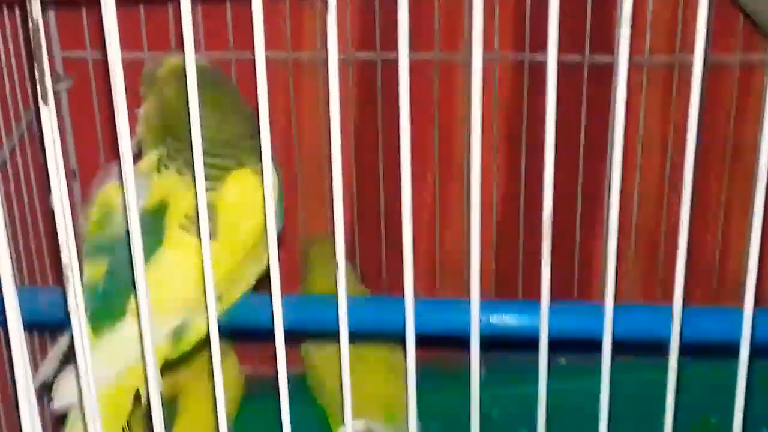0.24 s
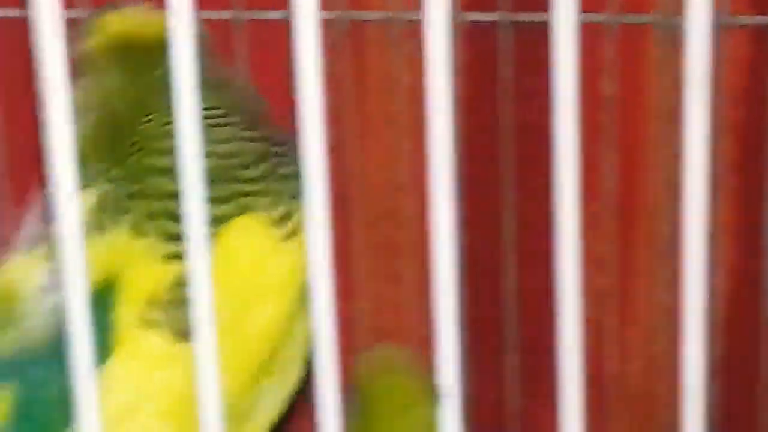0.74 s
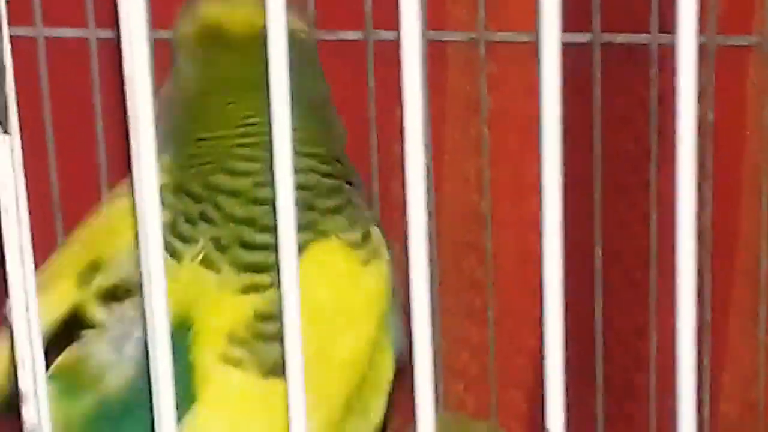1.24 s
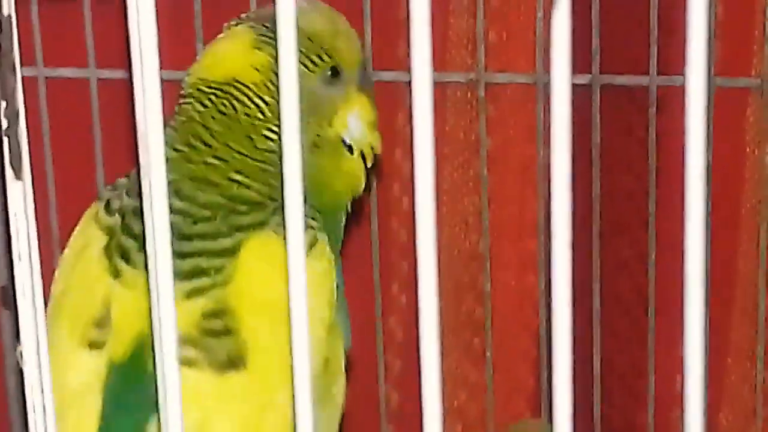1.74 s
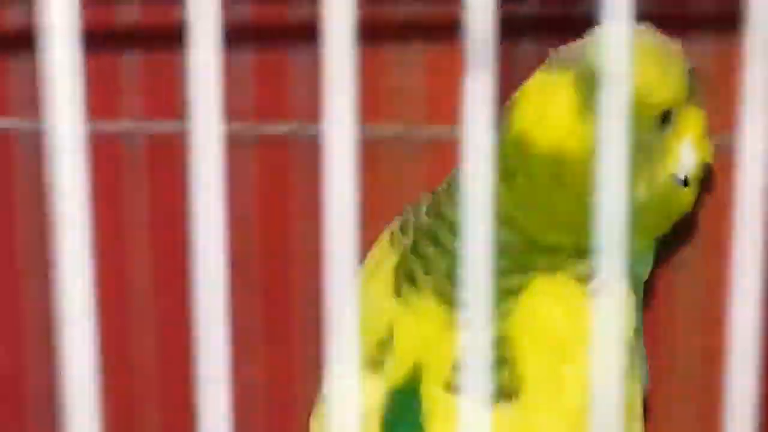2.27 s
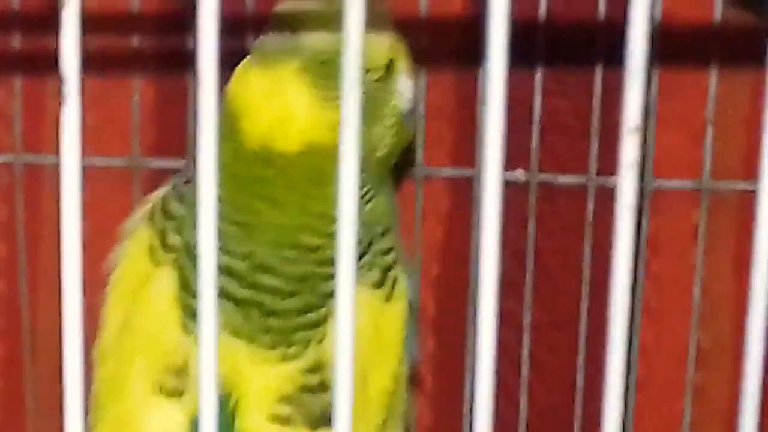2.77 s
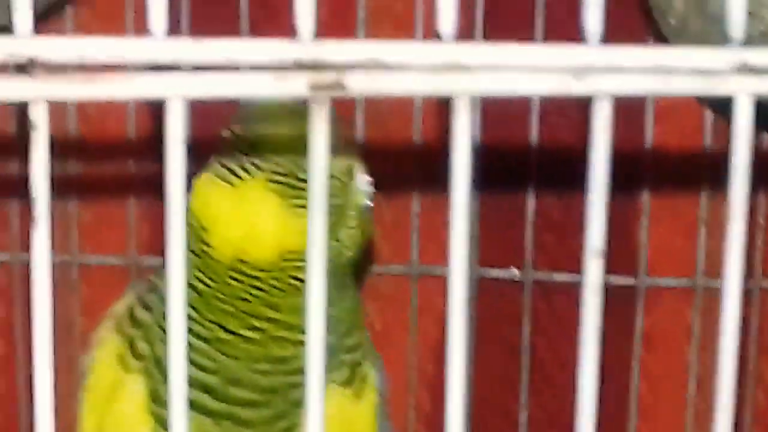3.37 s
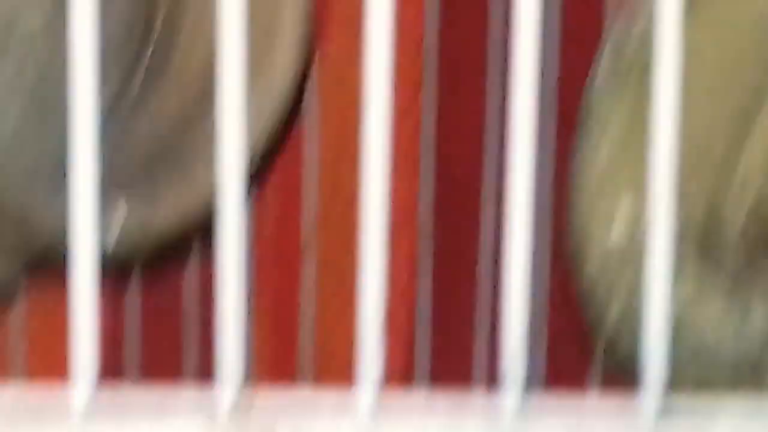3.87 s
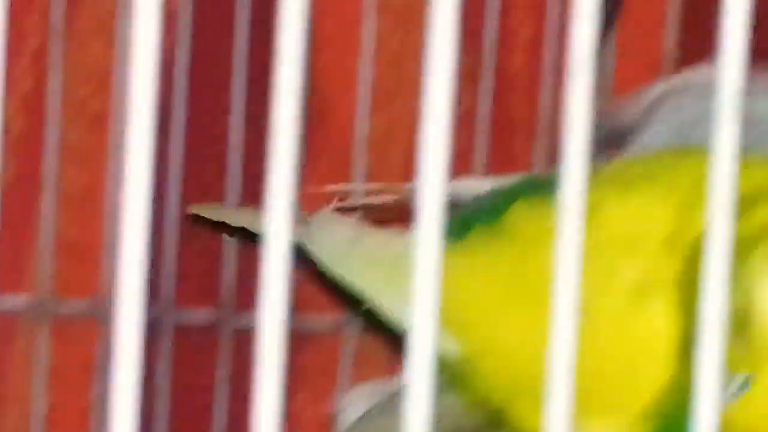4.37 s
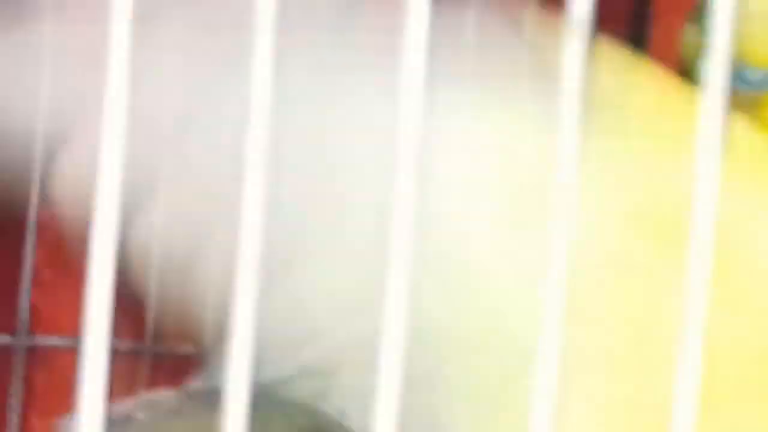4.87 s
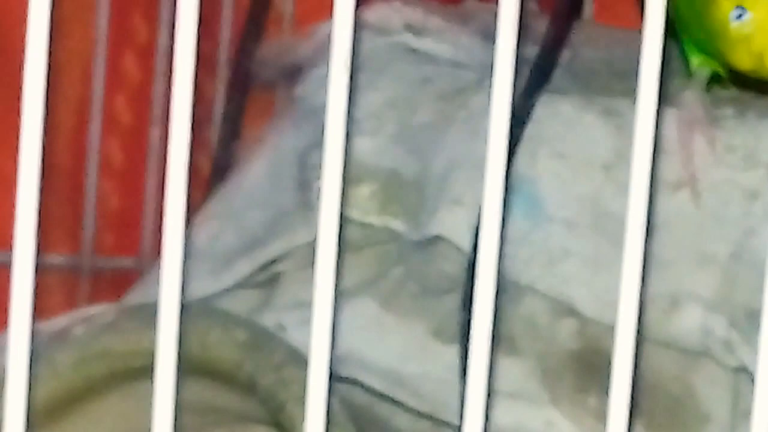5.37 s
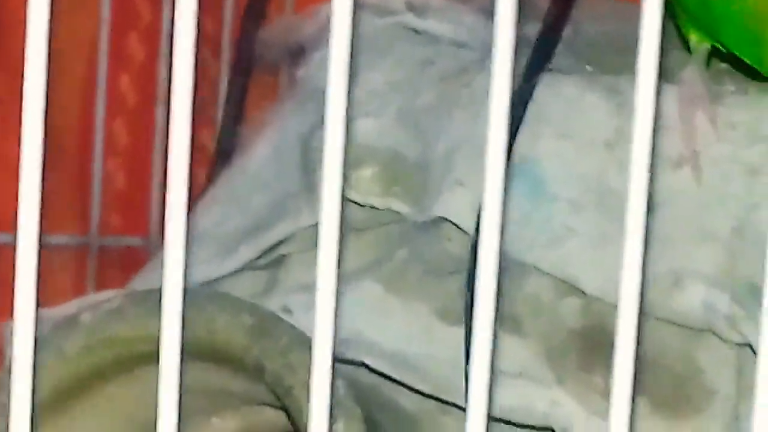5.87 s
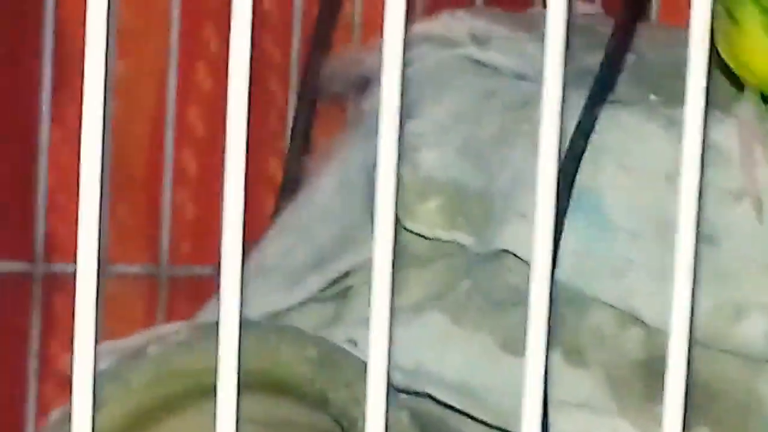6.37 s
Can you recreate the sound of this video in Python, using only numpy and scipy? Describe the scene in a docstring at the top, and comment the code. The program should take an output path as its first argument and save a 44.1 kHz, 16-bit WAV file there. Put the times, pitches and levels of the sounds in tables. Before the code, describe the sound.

Budgerigars chatter in a cage in a bare, hard-walled room, close to a phone. Soft, scratchy mutters and small whistled chirps come in clusters with gaps; after nearly four seconds a loud, bright burst rings out, then more strong chirps near five and six seconds. Distant birds twitter through the long echo, over faint low hum and hiss.

```python
"""Budgerigars chatter in a cage in a bare, hard-walled room, close to a phone.
Every note is a short gliding whistle with overtones; many are roughened into a rasp of pulses and hiss.
The room's long echo, made of fading noise, smears the notes. Birds further off twitter only through it.
Underneath are a mains hum, a plain tone of wavering level, and steady microphone hiss, filtered noise."""
import sys
import numpy as np
from scipy import signal
from scipy.fft import rfft, irfft, next_fast_len
from scipy.io import wavfile
from scipy.ndimage import uniform_filter1d

SR = 44100
rng = np.random.default_rng(int(sys.argv[2]) if len(sys.argv) > 2 else 0)


def persist_wave(psi):
    """Save psi, clipped to +-1, as 16-bit WAV."""
    counts = np.round(np.clip(psi, -1, 1) * 32767).astype(np.int16)
    wavfile.write(sys.argv[1], SR, np.atleast_2d(counts).T)


N = 291501  # length in samples
LEAD_S = 1  # seconds worked out before the scene opens, so that the echo is already going
USUAL_HZ = 2300  # usual pitch of a note


def undb(db):
    """Turn decibels into a gain."""
    return 10 ** (np.asarray(db) / 20)


def colour(x, points):
    """Filter a sound by (Hz, dB) points, joined by straight lines over log frequency."""
    size = next_fast_len(len(x))
    hz, db = np.transpose(points)
    f = np.maximum(np.arange(size // 2 + 1) * SR / size, 1)
    gain = undb(np.interp(np.log(f), np.log(hz), db))
    return irfft(rfft(x, size) * gain, size)[:len(x)]


# The notes of the near birds, one by one.
# Each row: start in seconds, level in dB before the beak colours it, start pitch in Hz, end pitch in Hz,
# length in seconds (at least 0.006 is played), first overtone in dB against the whistle,
# and echo in dB against the direct sound: higher for a bird further off or turned away.
NEAR_NOTES = [(.013, -35, 2750, 2810, 0.018, -31, -2), (.005, -46, 1233, 793, 0.039, -18, -1),
              (.014, -42, 3360, 3310, 0.013, -28, -4.5), (.015, -47, 1760, 1605, .021, -3, 1.7),
              (.061, -36, 2870, 2700, .014, -29, -9), (.075, -42, 2200, 2220, 0.011, -23, -13),
              (.075, -43, 1072, 1230, 0.018, 1.5, -3.5), (.1, -45, 1560, 1670, 0.018, 4, -14),
              (.118, -48, 2980, 3080, 0.017, -16, -3), (.223, -39.5, 2440, 2790, .02, -15, -2),
              (.223, -46, 1145, 1850, 0.025, -6, -0.5), (.237, -50, 3365, 3480, .024, -38, 8),
              (.262, -48, 2020, 2160, .015, 2, -1), (.243, -38, 1696, 1780, 0.023, -10, -10.5),
              (.282, -42, 2385, 1760, 0.053, -17, 1.5), (.325, -46.5, 1783, 1580, 0.0276, -3, -7),
              (.322, -38.5, 2987, 2630, 0.038, -33, -2.5), (.58, -42, 1904, 1938, 0.022, -16, 3),
              (.58, -32.5, 2580, 2520, 0.012, -24, 5), (.642, -35.5, 2590, 2600, 0.013, -39, -7),
              (.68, -37.5, 2600, 2420, 0.029, -23, -3), (.704, -39, 1066, 983, 0.035, -16, -15.5),
              (.72, -41.5, 2096, 1973, 0.043, -14.5, 4), (.729, -37.5, 1100, 1205, 0.029, -9.5, -3),
              (.76, -44.5, 855, 1020, .007, -25, 13.5), (.786, -30, 2785, 2764, 0.0067, -30, 3),
              (.783, -38.5, 1116, 1280, 0.02, -32, -10), (.806, -41.5, 1197, 944, 0.023, -37, -8.5),
              (1.288, -46.5, 2570, 2700, 0.021, -25, -15), (1.405, -45, 1434, 1630, 0.0087, 3.5, -0.5),
              (1.41, -42.5, 1024, 1080, 0.0054, -16, 6), (1.422, -43, 2316, 2660, 0.033, -30, 7),
              (1.42, -42, 2590, 2600, 0.0066, 4, -3.5), (1.544, -42, 2100, 1516, 0.034, -13, -3.5),
              (1.545, -36, 3100, 2637, 0.041, -27.5, 1.5), (1.682, -27.5, 2700, 2730, 0.0085, -39, 0.5),
              (1.68, -42.5, 1400, 990, 0.03, -22, 1), (1.702, -38.5, 2264, 2060, 0.015, -28.5, 5),
              (1.73, -30, 2515, 2780, 0.015, -35, -10), (1.764, -25.5, 2590, 2730, 0.014, -47, -3),
              (1.786, -33, 3050, 2995, 0.034, -41, -3), (1.797, -40, 2960, 1560, 0.022, -30, 6),
              (1.814, -54, 647, 1020, 0.022, -22, 10), (1.841, -43.5, 850, 1150, 0.027, -15, -5.5),
              (1.858, -43.5, 1150, 850, .024, -13.5, 0.5), (1.85, -36.5, 2940, 3060, .023, -36.5, -3.5),
              (1.895, -44, 900, 1186, 0.026, -17.5, -11), (1.928, -44.5, 1150, 842, 0.031, -32, -6.5),
              (2.011, -40, 1190, 980, .006, -25, 9), (2.181, -44, 2540, 2930, 0.026, -30.5, -12),
              (2.323, -50.5, 1303, 1330, 0.03, -16.5, -3), (2.42, -51.5, 797, 623, 0.042, -14, -4.5),
              (2.475, -48, 3370, 3160, .014, -34, -13.5), (2.48, -39.5, 2175, 1685, 0.046, -24.5, 3.5),
              (2.535, -49.5, 868, 640, 0.028, -12, -4), (2.505, -49.5, 3300, 3440, 0.042, -34, -1),
              (2.545, -40, 3270, 3240, 0.019, -44, 8), (2.57, -33, 3000, 3327, .045, -43.5, 3),
              (2.592, -33, 2896, 2420, 0.045, -54, 4.5), (2.617, -30, 2147, 2064, 0.025, -59.5, 1.2),
              (2.632, -34.5, 2840, 3100, .044, -41.5, -15),
              (2.644, -37.5, 1053, 1140, 0.0091, -10.5, -10.5), (2.66, -32.5, 1982, 2200, 0.046, -41, -6),
              (2.672, -50, 858, 673, 0.023, -16, -5.5), (2.787, -41, 1044, 1590, 0.0082, -19.5, 0),
              (2.859, -44.5, 993, 1050, 0.011, -18, -1.5), (2.915, -45.5, 830, 1266, 0.051, -12, -1),
              (2.958, -43, 1230, 990, 0.023, -32.5, -16.5), (2.981, -42, 1700, 1587, 0.021, -20, -13),
              (3.111, -39, 974, 1130, 0.0098, -18, -8), (3.149, -35, 2184, 2190, 0.0048, -44, -5),
              (3.156, -45, 1453, 1480, 0.0063, -16, 1.5), (3.206, -43, 1300, 956, 0.027, -19, -4.5),
              (3.231, -47, 1050, 1426, 0.037, -24, -7.5), (3.262, -42.5, 950, 1090, 0.029, -42, -15.5),
              (3.284, -45, 1070, 1610, 0.011, -27.5, 2), (3.338, -42.5, 2090, 1687, 0.018, -27, -4),
              (3.343, -39, 1083, 1070, 0.0064, -20.5, -1), (3.408, -44, 1302, 1210, 0.023, -24, -6.5),
              (3.49, -42.5, 1035, 1110, 0.012, -23.5, -8.5), (3.493, -45.5, 1890, 2490, 0.011, -36, 5.5),
              (3.56, -45, 2000, 1380, .021, -20, -11), (3.595, -46.5, 3060, 3190, 0.032, -38, -5),
              (3.632, -39, 2740, 2850, .011, -36.5, 6.5), (3.633, -43, 3090, 3530, 0.026, -42, 0.3),
              (3.697, -31.5, 2400, 1720, 0.052, -12.5, -6.5), (3.739, -27.5, 2690, 2740, 0.0082, -39, -5.5),
              (3.749, -22, 2790, 2930, 0.0073, -43.5, -14), (3.755, -24.5, 3360, 3224, .022, -33, 3.5),
              (3.77, -18, 2737, 2670, 0.012, -37.5, 0), (3.793, -16, 2877, 3160, 0.014, -39, 3.5),
              (3.805, -18, 3260, 3540, 0.024, -37.5, -0.5), (3.829, -17.5, 2510, 2746, 0.022, -40.5, -2),
              (3.832, -26, 2130, 2336, 0.031, -35, 0.5), (3.849, -31, 2184, 1650, 0.022, -12, 4.5),
              (3.852, -18, 3485, 3420, 0.025, -41.5, -5), (3.859, -41, 1383, 715, .016, -18, -4),
              (4.061, -44, 883, 1400, 0.028, -3, -12.5), (4.071, -35, 1883, 1990, 0.011, -23.5, 3.5),
              (4.09, -39, 1350, 966, 0.013, -26.5, -7), (4.118, -41, 1000, 1410, 0.0099, -17.5, 6.5),
              (4.168, -34, 1874, 1940, .015, -30, 2.5), (4.233, -35.5, 2590, 2447, 0.024, -48.5, .6),
              (4.277, -27.5, 2633, 2840, .017, -42.5, -3.5), (4.303, -26.5, 3065, 3430, 0.027, -41, -5.5),
              (4.331, -22.5, 2605, 2740, 0.0072, -24.5, -6.5), (4.336, -29.5, 2272, 2260, .016, -25, -0.3),
              (4.508, -40, 1176, 1223, 0.017, -12, -5), (4.53, -43, 1396, 1760, 0.022, -3, -5.5),
              (4.555, -32.5, 2025, 2177, 0.03, -12.5, -5), (4.575, -26.5, 2193, 2500, 0.015, -34, 5),
              (4.595, -32.5, 2304, 2894, 0.02, -41.5, 1), (4.643, -25.5, 2480, 2590, 0.0092, -32.5, -13),
              (4.778, -34, 2090, 2190, 0.0096, -6.5, -4), (4.787, -33.5, 2550, 3290, 0.0065, -30, 0),
              (4.794, -36, 3740, 3270, 0.013, -40, 1.5), (4.842, -38.5, 1065, 1110, 0.0064, -19, -5),
              (4.908, -24, 2746, 2845, .018, -47, 7.5), (4.929, -23.5, 3060, 3200, 0.02, -44, 4),
              (4.917, -37, 1768, 1680, 0.025, -1.5, -3), (4.929, -48.5, 918, 1260, 0.033, -15, -8),
              (4.967, -17, 2373, 2630, 0.022, -9, -4), (4.982, -18, 2596, 2944, 0.024, -5, -0.8),
              (4.998, -16.5, 3260, 3390, .02, -17, -3), (5.015, -28, 3020, 3120, .011, -20, -3.5),
              (5.084, -37.5, 1884, 1610, 0.032, -17, 2), (5.094, -18, 2643, 2410, .016, -9, -6.5),
              (5.125, -26, 3050, 3140, 0.015, -22.5, -5), (5.175, -19, 2492, 2690, 0.018, -25, -26.5),
              (5.32, -29, 3290, 3237, .008, -35, -8.5), (5.421, -48.5, 1186, 1795, 0.028, -13.5, 2.5),
              (5.471, -41.5, 1638, 1583, 0.021, -5, -6), (5.532, -45.5, 1532, 1140, 0.025, -29, 3),
              (5.565, -40, 2330, 2334, 0.01, -21, -11), (6.010, -29.5, 3098, 2930, 0.025, -15, 8),
              (6.021, -25, 2940, 3050, .016, -9, -7), (6.037, -20.5, 2570, 2530, 0.015, -10, 1.5),
              (6.054, -39, 3230, 3310, 0.0088, -36, 4), (6.129, -31.5, 1964, 1727, .037, -2.5, -6),
              (6.139, -17, 3074, 3010, 0.0244, -9, -9), (6.154, -20, 3004, 3058, 0.018, -9, 4),
              (6.183, -29, 2787, 2850, 0.056, -31.5, 6), (6.236, -18, 2653, 2760, 0.027, -28, -10),
              (6.241, -22, 3198, 3235, 0.031, -27, -1.5), (6.26, -35, 2914, 2645, 0.047, -33, -7.5),
              (6.518, -46, 850, 1360, 0.025, -14, 1), (6.543, -49.5, 1230, 1130, 0.036, -19, -7)]


def near_birds():
    """Birds near the phone: each note is heard both straight from the beak and through the room."""
    return sing(NEAR_NOTES)


# How the beak colours every note. Each row: frequency in Hz, gain in dB.
BEAK_COLOUR = [(250, -39), (600, -4), (1500, 4), (2500, -0.5), (3600, -0.5), (4300, -3.5), (6000, -11),
               (9000, -7.5), (14000, -24)]
# Colour of the rushing air in a rasp. Each row: frequency in Hz, relative level in dB.
RASP_AIR = [(1200, -33), (2500, 10.5), (4500, 2.5), (7000, -13), (10000, -27), (13000, -22), (16000, -17)]


def sing(rows):
    """Birds sing along a time line begun LEAD_S early: one track straight to the phone, one into the room."""
    tracks = np.zeros((2, N + (LEAD_S + 1) * SR))
    chances = np.clip(rng.standard_normal((len(rows), 3, 24)), -1.6, 1.6)
    air = colour(rng.standard_normal(tracks.shape[1]), RASP_AIR)
    air = air / np.std(air)
    for row, chance in zip(rows, chances):
        start_s, db, start_hz, end_hz, length, overtone_db, echo_db = row
        rasp = rasp_amount(db, start_hz, overtone_db, echo_db)
        i = int((start_s + LEAD_S) * SR)
        sound = note(db, start_hz, end_hz, length, overtone_db, rasp, chance, air[i:])
        tracks[:, i:i + len(sound)] += sound * undb([[0], [echo_db]])
    return [colour(track, BEAK_COLOUR)[:N + LEAD_S * SR] for track in tracks]


RASP_USUAL, RASP_PER_OCTAVE, RASP_PER_OVERTONE_DB, RASP_PER_ECHO_DB = .33, .1, .012, .03
HARSH_DB = -42  # an overtone louder than this adds rasp


def rasp_amount(db, start_hz, overtone_db, echo_db):
    """A voice gets rougher at higher pitch, with loud overtones, and for birds calling from further off."""
    from_pitch = RASP_PER_OCTAVE * np.log2(start_hz / USUAL_HZ)
    from_overtone = RASP_PER_OVERTONE_DB * max(db + overtone_db - HARSH_DB, 0)
    return RASP_USUAL + from_pitch + from_overtone + RASP_PER_ECHO_DB * echo_db


OVERTONE_FALL_DB = -23  # from each overtone to the next
RASP_HZ = 257.55  # pulses a second, before chance shifts their spacing
# at full rasp: pitch spread of the pulses (share), and decay of a pulse (nepers a period)
RASP_SCATTER, RASP_DAMP = 0.1077, 4.8
TREMBLE, FLICK = 0.0319, .15  # pitch unsteadiness, and pitch drop at the end (shares, scaled by chance)
AIR_DB = 6.5  # air hiss against the first overtone, at full rasp
ATTACK_S, BRIGHTEN_S = 0.0018, 0.0052  # the whistle starts fast; overtones and hiss follow as the beak opens


def note(db, start_hz, end_hz, length, overtone_db, rasp, chance, air):
    """A gliding whistle; in a rasp the voice breaks into damped pulses of varied pitch, size and spacing."""
    t = np.arange(int(max(length, .006) * SR)) / SR
    along = t / t[-1]  # 0 at the start of the note, 1 at its end
    rasp = np.clip(rasp, 0, 1)
    pitch, size, spacing = chance

    # count pulses along the note: the whole part is which pulse, the rest how far through it
    count = np.arange(len(pitch))
    gaps = np.exp(.3 * spacing) / RASP_HZ
    cycle = np.interp(t, np.cumsum(gaps) - gaps[0], count)
    pulse = cycle.astype(int)

    stray = TREMBLE * np.interp(cycle, count, size) + RASP_SCATTER * rasp * pitch[pulse]
    stray = stray - FLICK * np.abs(pitch[-1]) * along ** 4  # the pitch sags as the push runs out
    hz = start_hz * (end_hz / start_hz) ** along * np.exp(stray)
    phase = 2 * np.pi * np.cumsum(hz) / SR

    opening = np.minimum(t / BRIGHTEN_S, 1)
    overtones = sum(undb(overtone_db + k * OVERTONE_FALL_DB) * np.sin((k + 2) * phase) for k in range(3))
    tone = np.sin(phase) + opening * (1 - .5 * rasp) * overtones

    pulses = np.exp(-RASP_DAMP * rasp * (cycle - pulse)) * undb(2.24 * rasp * size[pulse])
    pulses = uniform_filter1d(pulses, size=int(0.00058 * SR))  # the syrinx cannot open at once
    pulses = pulses / np.sqrt(np.mean(pulses ** 2))

    hiss = opening * rasp * undb(overtone_db + AIR_DB) * air[:len(t)]
    hiss = hiss * np.sqrt(pulses)  # the square root keeps more hiss between pulses

    shape = np.minimum(t / ATTACK_S, 1) * np.cos(np.pi / 2 * along ** 2)
    shape = shape / np.sqrt(np.mean(shape ** 2))
    return np.sqrt(2) * undb(db) * (tone * pulses + hiss) * shape


# How loud the far birds are. Each row: time in seconds, usual level of one note in dB before the beak.
FAR_LEVEL = [(-1.5, -45), (-0.39, -39.5), (0.1, -56), (-0.5, -52.5), (3, -53.5), (3.5, -52.5), (4.5, -47),
             (4, -63), (7.5, -51)]
FAR_RATE = 60  # notes a second
FAR_SPREAD, FAR_SCATTER_DB = .25, 2.5  # chance spread of pitch (share) and of level


def far_birds():
    """Random twitter around the usual pitch, already going when the scene opens, for the room alone."""
    delay, pitch, glide, loudness = rng.standard_normal((int(FAR_RATE * (N / SR + LEAD_S)), 4)).T
    start_s = (np.arange(len(delay)) + np.abs(delay)) / FAR_RATE - LEAD_S
    start_hz = USUAL_HZ * np.exp(FAR_SPREAD * np.clip(pitch, -3, 1.2))
    end_hz = start_hz * np.exp(0.126 * glide)
    db = np.interp(start_s, *np.transpose(FAR_LEVEL)) + FAR_SCATTER_DB * loudness
    rows = [(s, level, a, b, .02, -30, 0) for s, level, a, b in zip(start_s, db, start_hz, end_hz)]
    direct, into_room = sing(rows)
    return into_room


# How the bare room rings. Each row: frequency in Hz, time to fade by 60 dB in seconds,
# starting level in dB against the other rows.
ROOM_RING = [(500, 6.1, -9), (960, 1.7, -4), (2070, 1.95, -2), (3240, 1.344, -2.5), (5900, 0.99, 2.5),
             (10000, 0.41, 1)]
ROOM_DB, ROOM_RISE_S = 6, 0.0063  # gain of the whole echo, and time constant of its build-up


def room(x):
    """Dense echo: noise in third-octave bands, each dying at its own rate after a short build-up."""
    t = np.arange(2 * SR) / SR
    hz, t60, db = np.transpose(ROOM_RING)
    spectrum = rfft(rng.standard_normal(len(t)))
    f = np.maximum(np.arange(SR + 1) / 2, 1)
    echo = 0
    for centre in 300 * 2 ** np.arange(0, 6, 1 / 3):
        weight = np.clip(1 - 3 * np.abs(np.log2(f / centre)), 0, 1)  # bands overlap like tents
        band = irfft(spectrum * weight)
        at = np.log(centre), np.log(hz)
        fade_db = np.interp(*at, db) - 60 * t / np.interp(*at, t60)
        echo = echo + band * undb(fade_db)
    echo = echo * (1 - np.exp(-t / ROOM_RISE_S))
    return signal.fftconvolve(x, echo * undb(ROOM_DB) / np.sqrt(SR / 8))[:len(x)]


# How the hum swells and fades. Each row: time in seconds, level in dB.
HUM_LEVEL = [(0.0, -58), (0.05, -58), (0.29, -65), (1.31, -62), (1.8, -76.5), (2.7, -66.5), (3.16, -69),
             (4.84, -59), (5.49, -72), (5.52, -68), (6.61, -79.5)]


def mains_hum():
    """Mains hum: a plain 100 Hz tone that swells and fades."""
    t = np.arange(N) / SR
    level = undb(np.interp(t, *np.transpose(HUM_LEVEL)))
    return np.sqrt(2) * level * np.sin(2 * np.pi * 100 * t)


# Colour of the microphone hiss. Each row: frequency in Hz, relative level in dB per Hz.
HISS_COLOUR = [(25, -16.5), (45, -11), (80, -1), (200, -2), (500, -5), (1500, -8), (5000, -25),
               (9000, -27.5), (16000, -27.5)]
HISS_DB = -61  # overall level


def microphone_hiss():
    """Microphone hiss: steady random noise, strongest in the bass."""
    hiss = colour(rng.standard_normal(N), HISS_COLOUR)
    return hiss * undb(HISS_DB) / np.std(hiss)


def scene():
    """Near birds direct and echoed, far birds only echoed, over hum and hiss."""
    direct, into_room = near_birds()
    birds = direct + room(into_room + far_birds())
    return (birds[LEAD_S * SR:] + mains_hum() + microphone_hiss())[None]


def record(dry):
    """The phone cuts the top: a steep filter removes what lies above 15750 Hz."""
    top_cut = signal.ellip(10, .2, 60, 15750, fs=SR, output="sos")
    return signal.sosfilt(top_cut, dry)


dry = scene()
out = record(dry)
persist_wave(out)
```